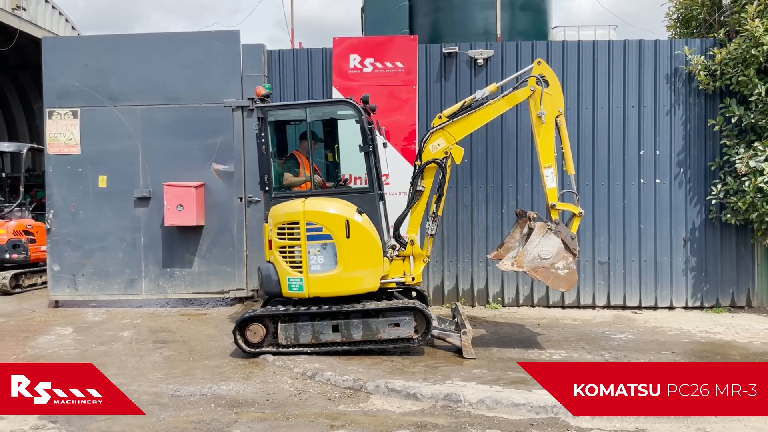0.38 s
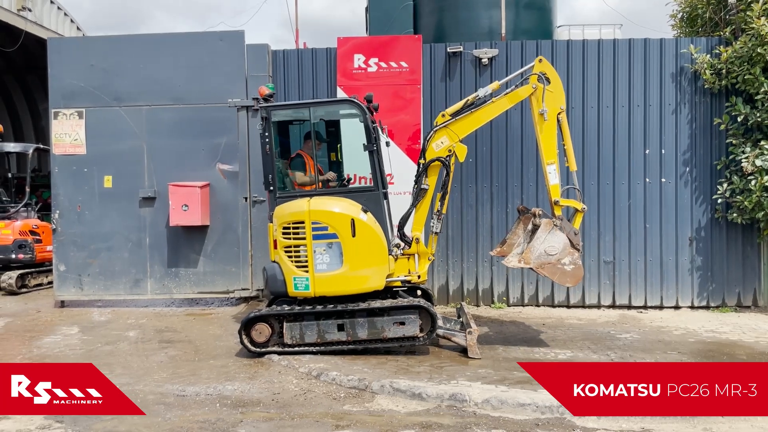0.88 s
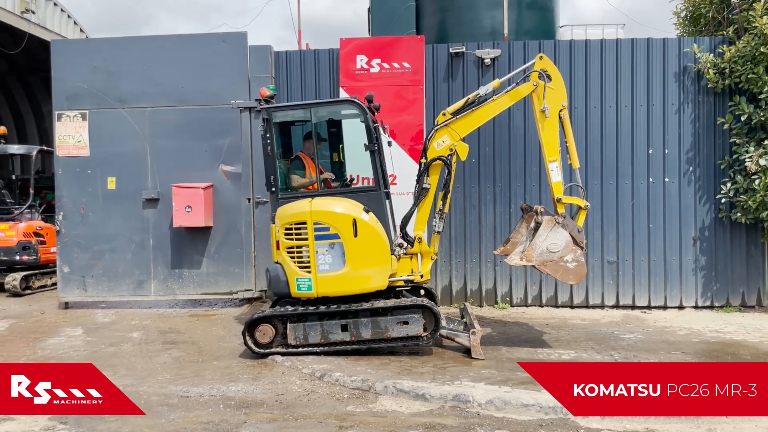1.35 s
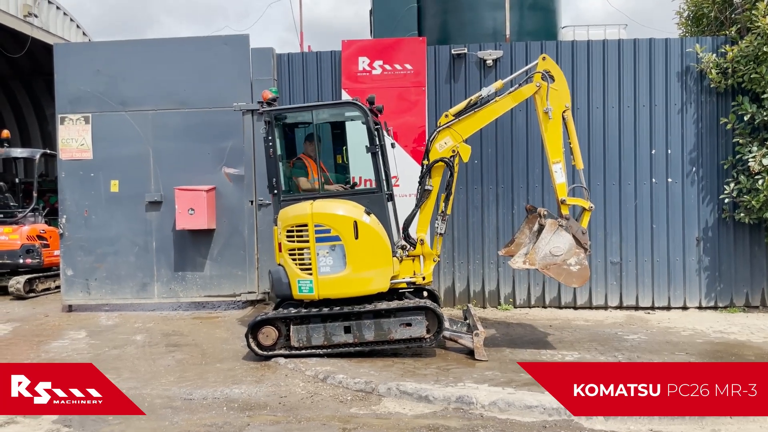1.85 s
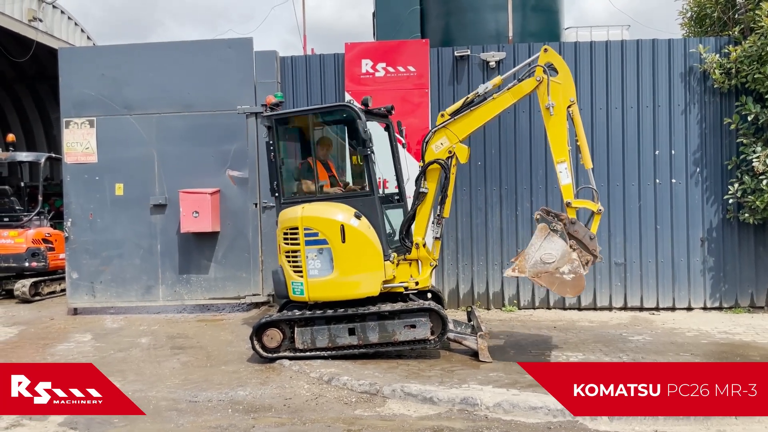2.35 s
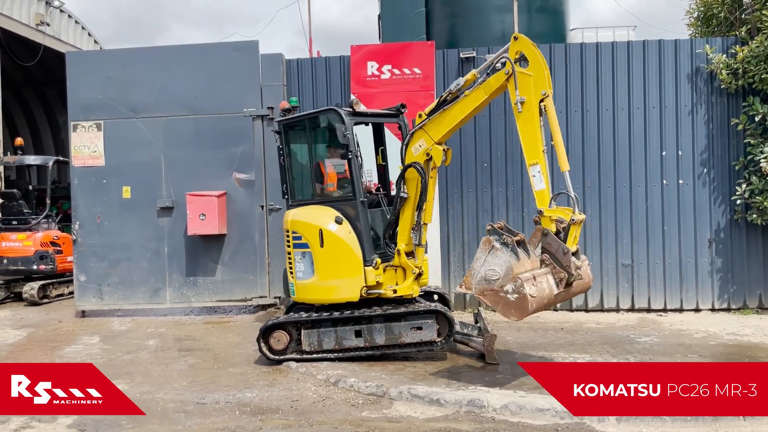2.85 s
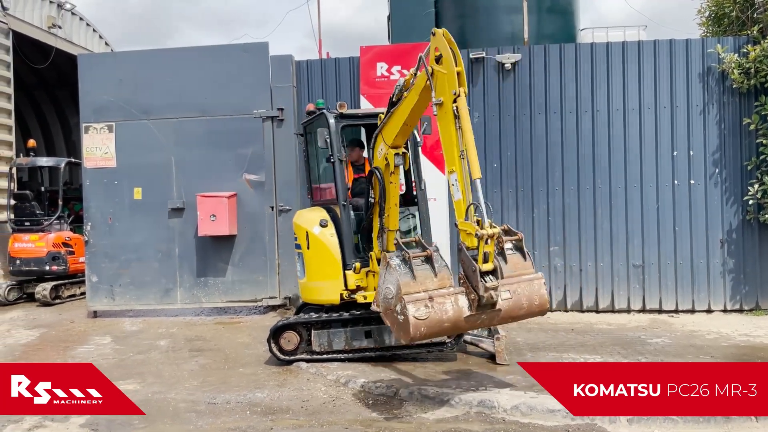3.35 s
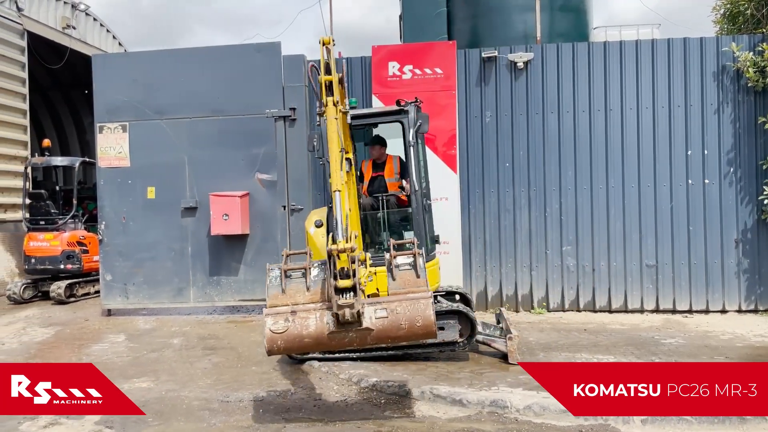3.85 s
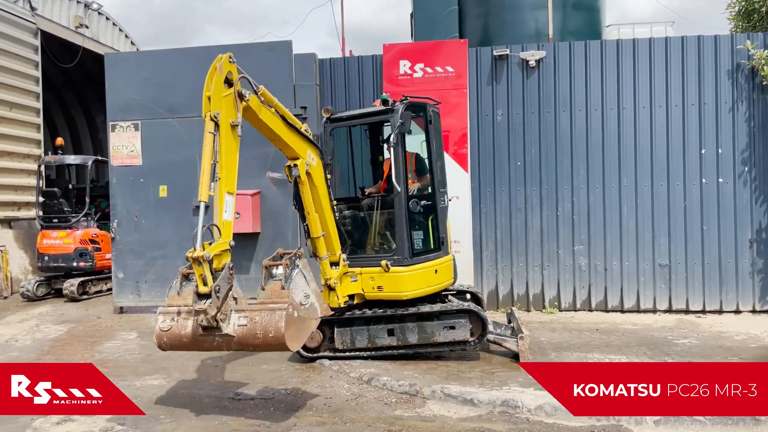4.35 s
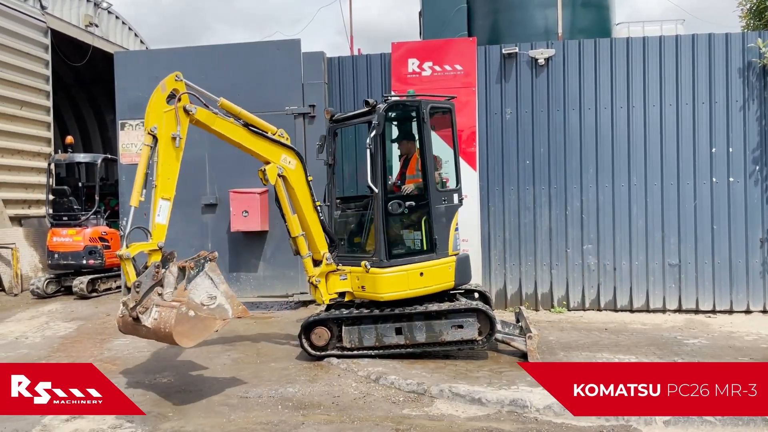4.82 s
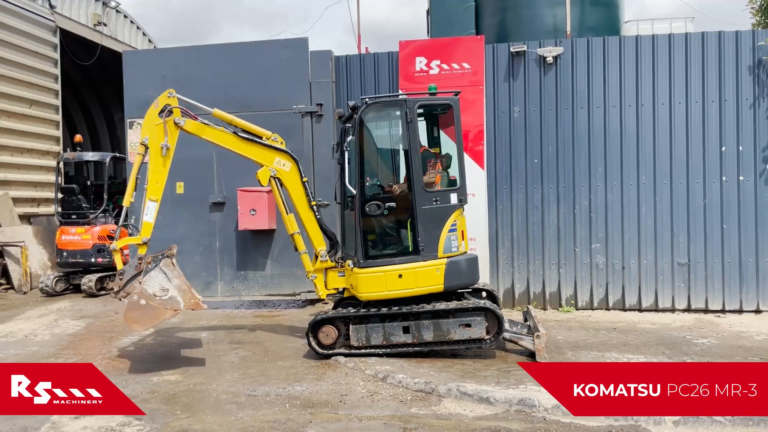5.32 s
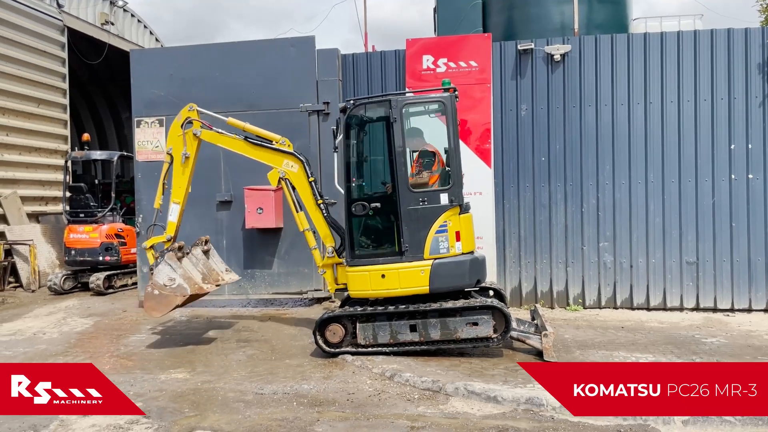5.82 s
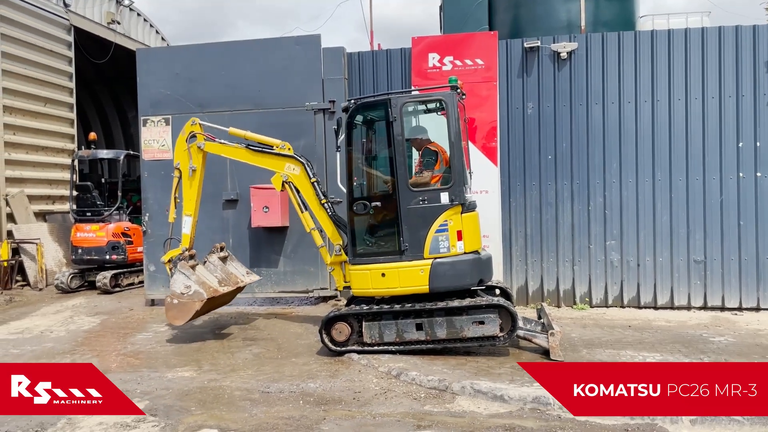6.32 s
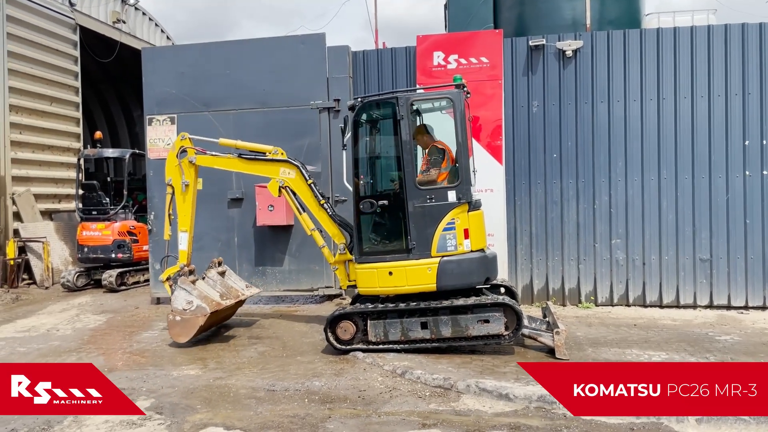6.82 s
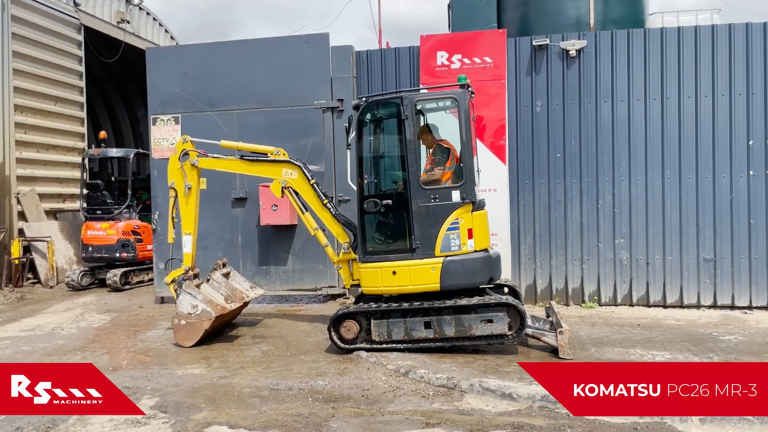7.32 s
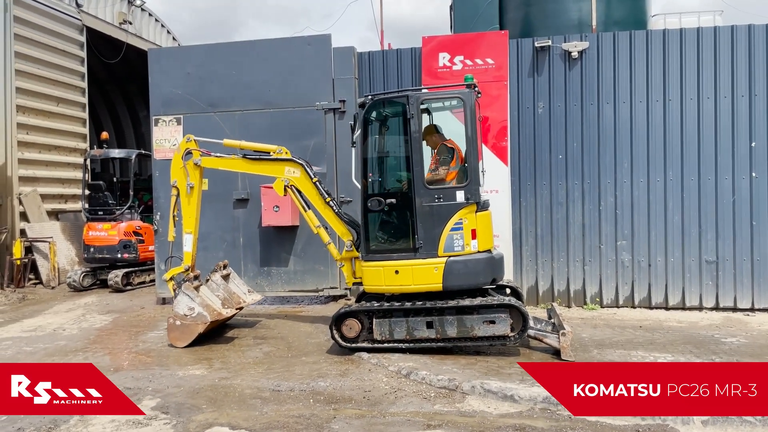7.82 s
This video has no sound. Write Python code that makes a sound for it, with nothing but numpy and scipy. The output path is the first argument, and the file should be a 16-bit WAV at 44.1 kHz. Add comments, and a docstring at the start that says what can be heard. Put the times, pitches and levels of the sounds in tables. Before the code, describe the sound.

Steady diesel chugging with hydraulic whine and oil hiss, low wind thumps, bass thinning midway, and finally a metallic bucket knock and short gritty drags.

```python
"""A small excavator's three-cylinder diesel throbs and rattles throughout as the cab slews; oil hisses at first.
Low noise bursts make the wind puffs, hardest near 1.2 s, and then a bass cut first slides up at 1.5 s.
From 2.3 s the low end narrows to mono, a steady whistle swells between 3.3 and 4.8 s, and more puffs follow.
From 6.9 s the bucket drops and drags: decaying tones ring its steel and gritty noise scrapes.
Sine tones make the exhaust and pump whine; coloured noise makes the rumble, panel drone, clatter and hiss."""
import sys
import numpy as np
from scipy import signal
from scipy.fft import rfft, irfft, next_fast_len
from scipy.io import wavfile
from scipy.ndimage import map_coordinates

SR = 44100
rng = np.random.default_rng(int(sys.argv[2]) if len(sys.argv) > 2 else 0)


def invert_db(level):
    """Linear amplitude ratio for a level in decibels (20 dB per decade), elementwise."""
    return 10 ** (np.asarray(level, dtype=float) / 20)


def store_pcm(level_fs):
    """Save levels as 16-bit WAV."""
    pcm = np.round(np.clip(level_fs, -1, 1) * 32767).astype(np.int16)
    wavfile.write(sys.argv[1], SR, np.atleast_2d(pcm).T)


N = 349697

# Hydraulic load. Each row: time in seconds, pump whine in relative dB, fourth exhaust tone in dB.
LOAD = [(0, -8, -34.5), (.7, 0, -41.5), (1.1, -5, -37.5), (1.55, 7.5, -42), (2.2, -8.5, -66),
        (2.6, -9, -62), (3.45, -3, -38), (3.8, -5, -34), (4.15, -1, -40.5), (4.5, 4, -60), (4.85, 1, -48),
        (5.4, 5.5, -35), (5.55, -5, -59), (6.7, -5, -59), (7.2, 1.5, -39), (7.55, 8, -45), (7.93, 6.5, -53)]
# Changing levels of the low exhaust throb and block rumble.
# Each row: time in seconds, exhaust throb in relative dB, block rumble in relative dB.
LOW_END = [(0, 6, -34), (1.2, 5.5, -33), (1.48, 3.5, -29.5), (1.6, -6, -45.5), (2.2, -14, -49.5),
           (2.45, -6, -55), (3.0, -7, -45), (3.3, -15.5, -49.5), (3.75, 3.5, -43.5), (4.2, 6, -38),
           (4.4, -2.5, -40.5), (4.85, -13, -51.5), (5.15, -11, -50.5), (5.4, -1.5, -41.5), (5.7, 1, -46.5),
           (6.15, -9, -57), (6.88, -11, -53.5), (7.05, -9.5, -40), (7.22, -1, -43), (7.45, -3, -32.5),
           (7.93, 3, -35.5)]
# How openly the engine bay faces the microphones while the cab turns. Each row: time in seconds, level in dB.
FACING = [(0, 0.5), (1.3, 2), (2.05, 0.5), (2.75, -5), (3.35, -13.5), (3.75, -2.5), (4.3, -1.5),
          (5.7, -0.5), (6.07, -7.5), (6.9, -11), (7.05, -1.5), (7.22, -3), (7.35, 4.5), (7.65, 1),
          (7.93, 0.5)]
# The bucket drags on the ground. Each row: start in seconds, hold in seconds, level in relative dB.
SCRAPES = [(6.934, 0.041, -28), (7.108, 0.032, -44), (7.33, .05, -36), (7.43, .04, -38.5),
           (7.53, 0.042, -37.5)]
SCRAPE_RISE_S = 0.0046


def unit(x):
    """Bring to an rms (average strength) of 1."""
    return x / np.sqrt(np.mean(x ** 2) + 1e-20)


def along(points, hz):
    """Read the columns of a table that starts with Hz, on a log frequency axis."""
    f, *cols = np.transpose(points)
    return [np.interp(np.log(hz + 1), np.log(f + 1), c) for c in cols]


def curves(rows, t=None):
    """Read the columns of a table that starts with seconds, at every sample or at the times t."""
    times, *cols = np.transpose(rows)
    if t is None:
        t = np.arange(N) / SR
    return [np.interp(t, times, c) for c in cols]


def wobble(rate):
    """A smooth random curve through `rate` random points a second."""
    at = np.arange(0, N + 32, 32)
    points = rng.standard_normal(int(N * rate / SR) + 4)
    return np.interp(np.arange(N), at, map_coordinates(points, [at * rate / SR]))


def filtered(x, response):
    """Shape sound x by a response that depends on frequency."""
    m = next_fast_len(N + 8192)
    return irfft(rfft(x, m) * response(np.fft.rfftfreq(m, 1 / SR)), m)[..., :N]


def modes(table, f):
    """Summed response of resonances, with alternating signs; rows hold centre Hz, width Hz and dB."""
    total = 0
    for k, (centre, width, db) in enumerate(table):
        damping = 1j * f * width
        total = total + (-1) ** k * invert_db(db) * damping / (centre * centre - f * f + damping)
    return total


def rush(spectrum, gate=1):
    """Two unrelated noises of one colour, direct and scattered, together at rms 1."""
    return unit(filtered(gate * rng.standard_normal((2, N)), lambda hz: invert_db(along(spectrum, hz)[0])))


def stroke(t, start, hold, rise, fall):
    """A straight rise from 0 to 1, held, then dying away."""
    rising = np.clip((t - start) / rise, 0, 1)
    return rising * np.exp(-np.clip(t - start - rise - hold, 0, None) / fall)


def strokes(rows, rise, fall):
    """Summed gain of strokes; rows hold start, hold and dB."""
    t = np.arange(N) / SR
    return sum(invert_db(db) * stroke(t, start, hold, rise, fall) for start, hold, db in rows)


def firing():
    """The governed engine speed gives the firing rate; adding it up gives the phase, one turn per firing."""
    # Each row: time in seconds, firings per second.
    speed = [(0, 64.4), (.2, 64.6), (.55, 67), (.75, 66.6), (.95, 64.5), (1.15, 65), (1.4, 66.4),
             (1.75, 65.9), (2.15, 64.5), (2.55, 65.7), (2.9, 66.2), (5.55, 66.15), (5.9, 67.1),
             (6.35, 66.3), (6.75, 66.65), (7.35, 66.3), (7.55, 64.3), (7.93, 64)]
    rate = curves(speed)[0]
    return rate, 2 * np.pi * np.cumsum(rate) / SR


def exhaust(rate, phase):
    """Tones at multiples of the firing rate grow as they slide through the pipe's resonances."""
    # Main exhaust tones. Each row: multiple of the firing rate, level in relative dB.
    orders = [(1 / 3, -40), (2 / 3, -28), (0.98, 0), (4 / 3, -10.5), (5 / 3, -17.5), (2, 0), (7 / 3, -13.5)]
    # Pipe resonances. Each row: centre in Hz, width in Hz, level in dB.
    pipe = [(68.1, 5.05, 13), (127.55, 6, 5)]
    # Higher tones that ride with the rumble. Each row: multiple of the firing rate, level in relative dB.
    overtones = [(3, -7), (11 / 3, -23), (5, -9), (6, -9), (7, -10), (22 / 3, -7.5), (23 / 3, -13),
                 (9, -12.5)]
    throb_db, rumble_db = curves(LOW_END)
    fourth_db = curves(LOAD)[1]
    tones = np.zeros(N)
    for k, db in orders:
        pipe_gain = invert_db(-11.5) + abs(modes(pipe, k * rate))
        tones += pipe_gain * invert_db(db + 1.65 * wobble(12)) * np.sin(k * phase + 0.33 * wobble(13))
    tones *= invert_db(throb_db - 27.5)
    tones += invert_db(fourth_db + 1.8 * wobble(5.5)) * np.sin(4 * phase + 0.13 * wobble(11))
    for k, db in overtones:
        tones += invert_db(rumble_db + db + 5.7 * wobble(6)) * np.sin(k * phase + 0.5 * wobble(10))
    return tones


def pump(phase):
    """Nine pistons on a shaft that turns once in 1.5 firings whine at twelve times the firing rate and up."""
    # Each row: multiple of the piston rate, level in relative dB.
    whine_tones = [(2, -40), (3, -53.5), (4, -53), (5, -54), (7, -67), (9, -54)]
    load_db = curves(LOAD)[0]
    whine = np.zeros(N)
    for k, db in whine_tones:
        smear = 0.087 * k * wobble(25)  # radians: the higher the tone, the more it smears
        whine += invert_db(load_db + db + 1.23 * wobble(8)) * np.sin(6 * k * phase + smear)
    return whine


def whistle():
    """A steady tone with a wavering phase and level, which swells briefly now and then."""
    # Each row: middle of the swell in seconds, level in relative dB.
    swells = [(3.3, -49.5), (3.55, -47), (4.2, -47), (4.78, -39.5)]
    pitch_hz, swell_s = 2883, 0.054
    t = np.arange(N) / SR
    gain = invert_db(-48 + 0.83 * curves(FACING)[0])  # follows most of the change in facing
    for middle, db in swells:
        gain = gain + invert_db(db) * np.exp(-((t - middle) / swell_s) ** 2)
    return gain * invert_db(2.9 * wobble(15)) * np.sin(2 * np.pi * pitch_hz * t + 1.3 * wobble(35))


def rumble(knock):
    """Low noise from the block, which swells a little with each firing."""
    # Noise colour. Each row: frequency in Hz, relative dB per Hz.
    colour = [(18, -34), (30, 9), (75, -1), (145, -8.5), (182, -16.5), (284, -13), (432, -25.5),
              (494, -16.5), (750, -30), (980, -74), (1650, -120)]
    rumble_db = curves(LOW_END)[1]
    return invert_db(rumble_db + 14.5 + 1.2 * wobble(12)) * rush(colour, 1 + 0.12 * knock)


def panels():
    """Noise drones in the resonances of the bonnet panels; the bucket's drag shakes them too."""
    # Each row: centre in Hz, width in Hz, level in dB.
    resonances = [(674, 79, -3.5), (758.7, 16.1, 5.5), (790, 40, 0), (848, 126, -3.5)]
    broad = [(765, 1100, 0)]  # one wide resonance over them all
    noise = invert_db(1.54 * wobble(45)) * rng.standard_normal((2, N))
    drone = unit(filtered(noise, lambda f: modes(resonances, f) * modes(broad, f)))
    steady = invert_db(-38 + 0.21 * curves(FACING)[0] + 1.1 * wobble(7))
    shake_db, shake_fall_s = 6, 0.069
    shake = invert_db(shake_db) * strokes(SCRAPES, SCRAPE_RISE_S, shake_fall_s)
    return (steady + shake) * drone


def clatter(knock, flutter):
    """Rattling mid and high noise, which follows the cab's turning in full and swells slightly per firing."""
    # Noise colour. Each row: frequency in Hz, relative dB per Hz.
    colour = [(700, -12), (950, 2.5), (1400, -3), (1800, -2.5), (2800, -2.5), (3600, -5.5), (5000, -8),
              (5800, -16.5), (7000, -12), (8500, -14.5), (10000, -82)]
    gate = (1 + 0.032 * knock) * invert_db(0.83 * wobble(200))
    return invert_db(-36.5 + curves(FACING)[0] + 0.58 * flutter) * rush(colour, gate)


def engine_hiss(flutter):
    """High noise that starts louder, then settles; turning the cab changes it only a little."""
    # Noise colour. Each row: frequency in Hz, relative dB per Hz.
    colour = [(4000, -23), (6000, -14), (7500, -7), (9000, 2.5), (10500, -0.5), (12000, -6), (13500, -15.5),
              (15500, -18.5)]
    sizzle = stroke(np.arange(N) / SR, -1.03, 1.19, 0.01, 0.036)  # already on, settles from 0.17 s
    level_db = -43.5 + 0.13 * curves(FACING)[0] + 4.5 * sizzle
    level_db += 0.15 * flutter + 0.074 * wobble(6.2)
    return invert_db(level_db) * rush(colour, invert_db(0.63 * wobble(300)))


def engine():
    """Exhaust, pump and whistle tones join noises, two of which swell with the firings."""
    rate, phase = firing()
    tones = exhaust(rate, phase)
    whine = pump(phase) + whistle()
    # each firing knocks the block; the cylinders differ
    knock = np.cos(phase) + 0.27 * np.cos(phase / 3) + 0.3 * np.cos(2 * phase / 3)
    flutter = wobble(9.2)  # shared by clatter and hiss
    noise = rumble(knock) + panels() + clatter(knock, flutter) + engine_hiss(flutter)
    return noise + np.array([tones + whine, 0.5 * whine])


def bucket():
    """Steel contacts ring the bucket as dying tones with a crack of noise; grit scrapes under it."""
    # Steel contacts. Each row: start in seconds, level in relative dB.
    knocks = [(6.9324, -21), (6.9437, -19.5), (6.976, -33), (7.1094, -26)]
    # Ringing tones. Each row: frequency in Hz, level in relative dB, seconds to fall by 60 dB.
    ring_tones = [(220, 6, 0.14), (285.5, -2, 0.26), (560, -5, 0.23), (780, -4.5, 0.7), (803, -3.5, 0.38),
                  (890, -6, .2), (2150, -18, .07), (3010, -15, .08), (4660, -8, 0.11), (5070, -19, .07),
                  (6600, -7.5, 0.15), (10640, -12, .1), (11800, -12, 0.1)]
    # Colour of the grit noise. Each row: frequency in Hz, relative dB per Hz.
    grit = [(88, -48), (150, -11), (285, -27), (500, -29), (796, -1), (1130, -14.5), (5760, -22),
            (6350, -23.5), (7560, -24.5), (11400, -24), (15500, -67)]
    out, t = np.zeros((2, N + SR)), np.arange(SR // 2) / SR
    onset = 1 - np.exp(-t / 0.0018)
    for start, db in knocks:
        for row in out:
            ring = np.zeros(len(t))
            for hz, level, t60 in ring_tones:
                ring += invert_db(level + rng.normal(0, 3.8) - 60 * t / t60) * np.sin(2 * np.pi * hz * t)
            crack = 1.7 * invert_db(-60 * t / 0.02) * rng.standard_normal(len(t))
            row[round(start * SR):][:len(t)] += invert_db(db - 5.5) * (ring + crack) * onset
    scrape = strokes(SCRAPES, SCRAPE_RISE_S, 0.033) * invert_db(4.5) * rush(grit, invert_db(2.7 * wobble(120)))
    return out[:, :N] + scrape


def wind():
    """Each puff on the microphones is a short low burst with a sharp front, mostly shared by both ports."""
    # Each row: time in seconds (the burst starts 4 ms earlier), body in relative dB, front in relative dB.
    puffs = [(0.882, -16, -39), (0.922, -22, -36), (1.15, -19, -34), (1.184, -1, -23), (1.227, -9, -23),
             (1.248, -6.5, -37), (1.266, -6.5, -23), (1.332, -16, -30), (1.361, -7, -34),
             (1.383, -4.5, -29), (1.422, -13, -26), (1.448, -9.5, -23), (1.479, -12.5, -38),
             (1.533, -15.5, -32), (1.548, -19.5, -20), (1.965, -27, -34), (2.294, -32, -32),
             (2.676, -29, -35), (3.08, -38, -31.5), (4.24, -10, -34), (4.266, -20.5, -30),
             (4.287, -20, -30), (4.309, -24, -41), (4.329, -21.5, -39), (4.366, -13, -44),
             (4.446, -35, -28.5), (4.507, -29, -34), (5.463, -25, -28.5), (5.551, -24.5, -40),
             (5.566, -28, -31), (5.658, -22.5, -34), (5.688, -30, -31), (5.73, -33, -26.5),
             (5.755, -32, -38), (5.789, -35, -25.5), (5.829, -37, -31.5), (5.899, -25, -42),
             (6.023, -33, -38), (6.083, -36.5, -41), (6.539, -34, -38), (6.618, -35, -49),
             (7.627, -18.5, -37)]
    # Colour of the body. Each row: frequency in Hz, relative dB per Hz.
    body_colour = [(15, -36), (25, 9), (65, -1.5), (219, -7.5), (328, -9), (628, -19.5), (692, -53),
                   (762, -37.5), (1200, -43), (1560, -84), (2640, -120)]
    # Colour of the sharp front. Each row: frequency in Hz, relative dB per Hz.
    front_colour = [(150, -30), (300, 4), (600, 13), (1100, -4.5), (2000, -9.5), (2600, -32), (4000, -80)]
    u, out = np.arange(SR // 8) / SR, np.zeros((2, N))
    low, snap = rush(body_colour), rush(front_colour)
    body_shape = u * (np.exp(-u / 0.0058) + 0.043 * np.exp(-u / 0.02))  # the second part trails on
    front_shape = u * np.exp(-u / 0.0037)
    for s, db, front_db in puffs:
        start = round((s - 0.004) * SR)
        near = slice(start, start + len(u))
        body = low[:, near] * body_shape
        front = snap[:, near] * front_shape
        out[:, near] += invert_db(db + 4) * body / abs(body[0]).max()
        out[:, near] += invert_db(front_db + 4.5) * front / abs(front[0]).max()
    side = 0.36 * out[1]
    return np.array([out[0] + side, out[0] - side])


def valves():
    """While valves are open, throttled oil hisses as noise in two pipe resonances."""
    # Valves open. Each row: start in seconds, hold in seconds, level in relative dB.
    openings = [(-.3, 2.57, -42.5), (3.7, 0.51, -47), (7.25, .15, -40.5)]
    # Pipe resonances. Each row: centre in Hz, width in Hz, level in dB before the response is squared.
    resonances = [(1280, 180, 1), (1736, 260, 3.5)]
    hiss = filtered(rng.standard_normal((2, N)), lambda f: modes(resonances, f) ** 2)
    return strokes(openings, 0.091, 0.18) * invert_db(1.8 * wobble(12)) * unit(hiss)


def ports(pair):
    """Mix direct and scattered sound into two microphone ports that differ in phase and level."""
    # Each row: frequency in Hz, likeness from 0 to 1, radians by which right leads, left minus right in dB.
    port_table = [(61.4, 1, 0, 1), (403, 0.43, 0.68, -1.5), (760, 0.4, -0.35, -0.5), (1152, 0.87, -1.76, 1),
                  (1480, 0, 1.5, 2.5), (1980, 0.56, 0, 0), (2320, 0, 0.5, 5.5), (2710, 0.93, -0.46, -0.5),
                  (3075, 0.23, -2, 4), (4020, 0.55, 0.7, 2), (5000, 0.85, -2, 5), (5700, 0.9, 2, 0.5),
                  (6470, 1, 1, -0.5), (7950, 0.82, 3, 3), (8400, 0.97, np.pi, 0.5), (9140, 0.94, 3.5, -0.5),
                  (10650, 0.97, 4.5, -0.5), (12400, 0.6, 5.5, 0), (13000, 0.65, 2 * np.pi, 0),
                  (14000, 0.5, 7.5, 0), (15300, 0.8, 2 * np.pi, 0)]

    def response(hz):
        alike, lead, db = along(port_table, hz)
        angle = np.arccos(np.clip(alike, 0, 1)) / 2  # a wider angle makes the ports less alike
        tilt = invert_db(db / 2) * np.exp(-0.5j * lead)
        left = [np.cos(angle) * tilt, np.sin(angle) * tilt]
        right = [np.cos(angle) / tilt, -np.sin(angle) / tilt]
        return np.array([left, right])

    return filtered(pair, response).sum(axis=1)


def bass_strength(t):
    """Strength of the sliding bass cut in dB at 66 Hz: where strokes overlap, the deepest wins."""
    # Moments when the cut slides up, holds and slides back.
    # Each row: start in seconds, strength in dB, hold in seconds, slide back in seconds.
    clamps = [(1.495, 69, 0.15, 0.36), (4.323, 68, .05, 0.55), (4.617, 70, 0.14, .45), (5.39, 64, 0.52, .3),
              (5.847, 90, 0.27, 0.27), (6.518, 71.5, 0.2, 0.21)]
    open_db, rest_db, rise_s = 2, 31.5, 0.06  # before the first stroke, and between later ones
    rest = open_db + (rest_db - open_db) * np.clip((t - clamps[0][0]) / rise_s, 0, 1)
    extra = [(db - rest_db) * stroke(t, s, hold, rise_s, back) for s, db, hold, back in clamps]
    return rest + np.max(extra, axis=0)


def scene():
    """The machine is heard through the ports, the wind straight on them."""
    return ports(engine() + valves() + bucket()) + wind()


def top_cut(x):
    """Nothing passes above the cut-off."""
    return signal.sosfilt(signal.butter(12, 15670, fs=SR, output="sos"), x)


def record(dry):
    """A phone's steep sliding bass cut, mono low end, treble limit and soft rounding of loud peaks."""
    # Each row: time in seconds, frequency in Hz below which both sides are alike.
    mono = [(0, 20), (2.3, 20), (2.34, 270), (2.6, 430), (3, 590), (4, 770), (7.93, 800)]
    top_hz = 15750
    mid_side = np.array([dry[0] + dry[1], dry[0] - dry[1]]) / 2
    hz, t, z = signal.stft(mid_side, SR, nperseg=2048, noverlap=1792)
    hz = hz[:, None] + 1  # keeps clear of dividing by zero
    cut = 1 / np.sqrt(1 + (invert_db(bass_strength(t)) * (66 / hz) ** 6.2) ** 2)
    z *= (hz < top_hz) * (cut + invert_db(-72))  # a little bass always leaks past
    z[1] /= np.sqrt(1 + (curves(mono, t)[0] / hz) ** 24)
    mid, side = signal.istft(z, SR, nperseg=2048, noverlap=1792)[1][:, :N]
    pair = np.array([mid + side, mid - side])
    pair /= (1 + abs(pair / 0.95) ** 4) ** 0.25  # the input stage rounds off the loudest peaks
    return top_cut(pair)


dry = scene()
out = record(dry)
store_pcm(out)
```